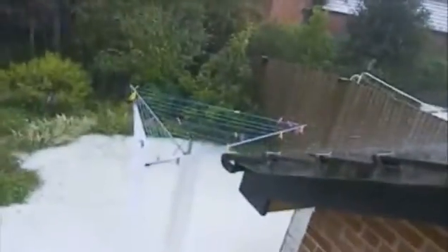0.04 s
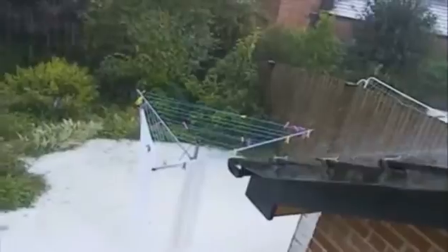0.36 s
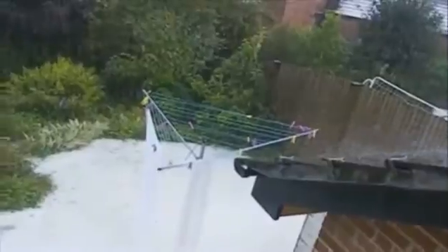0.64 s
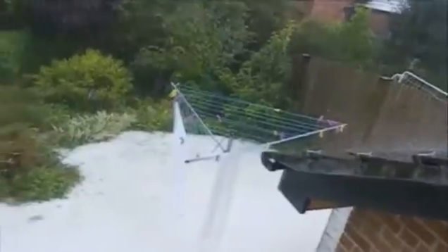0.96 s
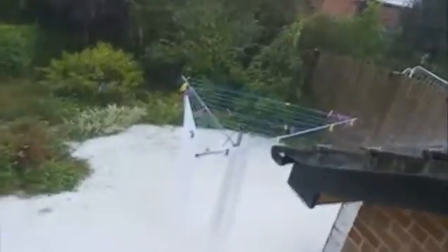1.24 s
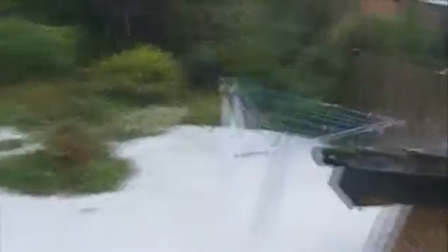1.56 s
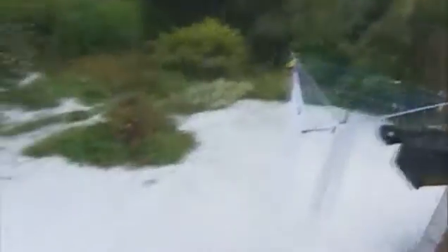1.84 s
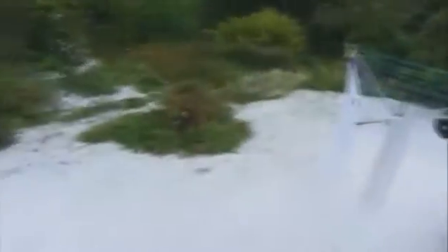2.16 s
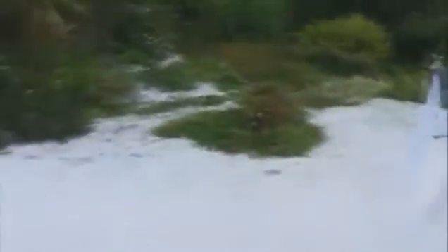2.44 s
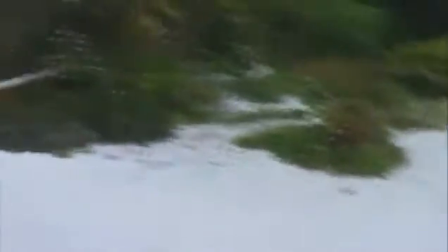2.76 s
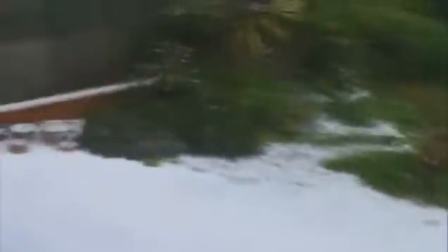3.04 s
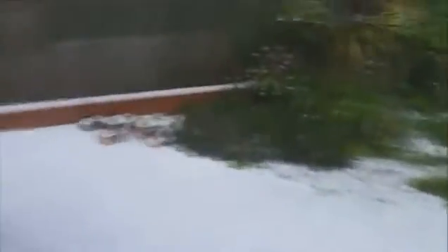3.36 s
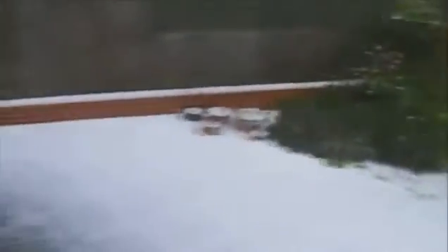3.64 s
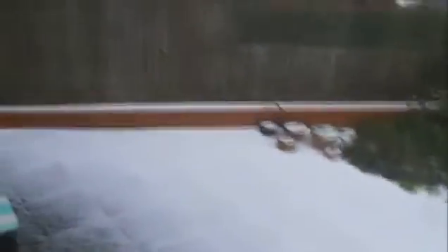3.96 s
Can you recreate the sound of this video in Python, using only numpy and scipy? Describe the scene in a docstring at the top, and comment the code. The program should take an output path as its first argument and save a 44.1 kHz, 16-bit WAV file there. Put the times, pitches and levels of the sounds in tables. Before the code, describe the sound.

Heavy hail roars steadily on a garden, with sharp clacks on nearby roof tiles.

```python
"""Heavy hail on a garden

Heard from a window above a low roof, countless stones merge into a roar.
Nearer ones patter, clack and snap on the tiles, and one knocks on something hollow.
Stones landing right by the microphone give tiny sharp ticks that make the recorder
turn its volume down for a moment."""
import sys
import numpy as np
from scipy import signal
from scipy.io import wavfile

SR = 44100
rng = np.random.default_rng(int(sys.argv[2]) if len(sys.argv) > 2 else 0)


def unload_wav(signal):
    """Save mono or channel-first audio to the path in sys.argv[1] as 16-bit WAV at rate SR, clipped to [-1, 1]."""
    wavfile.write(
        sys.argv[1],
        SR,
        np.round(np.clip(np.atleast_2d(signal).T, -1, 1) * 32767).astype(np.int16),
    )


N = 176400  # 4 seconds

# How strong the far roar is, from low to high: (pitch [Hz], level [dB])
ROAR_TONE = [(25, -15), (55, -22), (100, -15.5), (150, -1), (250, 0.5), (400, 5), (630, 5), (1000, 0.5),
             (1600, 1), (2300, 0), (3200, -2.5), (4200, -2.5), (5200, -12), (6000, -5.5), (6800, -11.5),
             (9000, -20.5)]


def roar(level_db=-31.5, flicker_db=1.66):
    """Far hail on lawn and leaves blurs into bands of noise, each flickering a little."""
    edges = 20 * 2 ** np.arange(0, 9.1, .5)  # half an octave apart
    noise = rng.standard_normal((2, N))
    out = 0
    for k, (low, high) in enumerate(zip(edges, edges[1:])):
        band = pass_only(noise[k % 2], "band", [low, high], order=2)
        band_db = at_hz(ROAR_TONE, np.sqrt(low * high)) + flicker_db * drift(22)
        out = out + band * from_db(band_db)
    return from_db(level_db) * rms_one(out)


# How strong the patter is, from low to high: (pitch [Hz], level [dB])
PATTER_TONE = [(130, -6), (300, -9), (650, -3), (1200, -2.5), (2500, -1), (4000, 3), (5500, -2.5),
               (6800, -14.5)]


def patter(level_db=-31.5, stones_per_s=3000, spread_db=2.5, colour_db=3.5, ring_cycles=5.74):
    """Nearer stones land at random; each rings very briefly with its own mix of pitches."""
    sizes_db = spread_db * np.minimum(rng.exponential(1, N), 3.2)  # many small, few big
    lands = rng.random(N) < stones_per_s / SR
    out = 0
    for hz in np.geomspace(140, 7500, 26):
        colour, sign = rng.uniform(-1, 1, (N, 2))[lands].T
        clicks = np.zeros(N)
        clicks[lands] = np.sign(sign) * from_db(sizes_db[lands] + colour_db * colour)
        ringing = rms_one(ring(clicks, hz, ring_cycles / hz))
        out = out + np.sqrt(hz) * from_db(at_hz(PATTER_TONE, hz)) * ringing
    return from_db(level_db) * rms_one(out)


# Big stones hitting the tiles: (time [s], level [dB])
TILE_HITS = [(.028, -22), (.083, -16), (.24, -27), (.313, -15), (.35, -19), (.562, -17), (.672, -23),
             (.693, -21), (.718, -22), (.948, -12.5), (1.305, -21), (1.395, -17), (1.515, -16),
             (1.633, -24), (1.665, -18.5), (1.79, -23), (1.848, -14), (2.022, -16), (2.31, -22.5),
             (2.845, -15.5), (3.18, -22), (3.472, -26), (3.515, -24), (3.687, -16), (3.722, -22.5)]


def clacks():
    """A big stone shatters on a tile in a short burst of chips."""
    return from_db(-6) * burst(clicks_of(TILE_HITS), hz=2970, fade_s=.038, ring_s=.002, rise_s=.0027)


# Close stones hitting a hard surface: (time [s], level [dB])
CLOSE_BOUNCES = [(.2475, -24), (.4238, -21), (.4435, -6.5), (.6873, -8), (1.1408, -13), (1.299, -19),
                 (1.4025, -14), (1.7905, -12), (1.8552, -22), (2.0795, -11), (2.2045, -16), (3.1931, -12),
                 (3.2545, -13), (3.3605, -25), (3.514, -23), (3.6815, -22), (3.8008, -16)]


def snaps():
    """A close stone bounces off whole with one dry snap."""
    return ring(clicks_of(CLOSE_BOUNCES), hz=3720, fade_s=.00082)


# Stones landing by the microphone: (time [s], level [dB])
MIC_HITS = [(.162, -7.5), (.255, -10), (.378, -6), (.41, -7.5), (.462, -11), (.735, -7), (.77, -9),
            (.812, -.5), (.842, -3), (.97, -6), (1.32, -9.5), (1.411, -4.5), (1.465, -6.5), (1.56, -11),
            (1.685, -5.5), (1.88, -9.5), (1.93, -9.5), (2.51, -6.5), (2.57, -4), (2.63, -6), (3.02, -8.5),
            (3.10, -8.5), (3.555, -5.5), (3.652, -7.5), (3.825, -3.5), (3.875, -2)]


def ticks():
    """Ice strikes right by the microphone: a tiny, bright tick, then a faint rattle."""
    hits = clicks_of(MIC_HITS)
    tick = pass_only(ring(hits, hz=11160, fade_s=.0018), "high", 6800, order=4)
    rattle = burst(hits, hz=4126, fade_s=.075, ring_s=.007, rise_s=.0025)
    return tick + from_db(-20) * rattle


# The one hit on something hollow: (time [s], level [dB])
HOLLOW_HIT = (1.238, -25)
# The notes it rings with: (pitch [Hz], level [dB], fade time [s])
HOLLOW_NOTES = [(223.5, 0.5, 0.16), (413, -21, 0.099), (722, 0.5, 0.053)]


def knock():
    """One stone sets something hollow ringing."""
    hit = clicks_of([HOLLOW_HIT])
    return sum(from_db(db) * ring(hit, hz, fade_s) for hz, db, fade_s in HOLLOW_NOTES)


def grit(level_db=-39, chips_per_s=450):
    """Chips of ice bounce and skitter, making a fine, bright crackle."""
    clicks = (rng.random(N) < chips_per_s / SR) * rng.standard_normal(N)
    return from_db(level_db) * random_rings(clicks, low_hz=3300, high_hz=6400, count=12, fade_s=.003)


def pings(level_db=-41, stones_per_s=130):
    """Some stones find a hard edge that rings briefly at one pitch."""
    clicks = (rng.random(N) < stones_per_s / SR) * rng.uniform(-1.05, 1, N)
    return from_db(level_db) * random_rings(clicks, low_hz=2076, high_hz=3758, count=44, fade_s=.15)


def gain_control(x, limit_db=-14, recover_db_per_s=68.5, react_s=.0023):
    """A loud peak makes the recorder turn down fast; the volume then climbs steadily back."""
    excess_db = np.maximum(20 * np.log10(np.abs(x) + 1e-9) - limit_db, 0)
    climb_db = recover_db_per_s * np.arange(N) / SR
    dip_db = np.maximum.accumulate(excess_db + climb_db) - climb_db
    return x * from_db(-smooth(dip_db, react_s))


# Two bands that the microphone boosts, shifting as it is turned:
# (time [s], pitch [Hz], width [Hz], boost [dB])
MIC_LOWER_BAND = [(0, 2580, 750, 6.5), (0.599, 2610, 762, 6), (1.2, 2540, 645, 6), (1.9, 2660, 595, 6.5),
                  (2.6, 2620, 608, 5.5), (2.95, 2800, 587, 4), (3.2, 2250, 810, 4), (3.47, 2390, 794, 7),
                  (3.72, 2610, 750, 7.5), (4, 2450, 756, 5)]
MIC_UPPER_BAND = [(0, 3220, 590, 4.8), (.6, 3080, 590, 6.2), (1.2, 3060, 556, 5.8), (1.9, 3070, 550, 4.4),
                  (2.6, 3120, 550, 4.7), (2.85, 3250, 300, 7.4), (3.1, 3180, 330, 9.6),
                  (3.33, 3250, 380, 11), (3.39, 3450, 750, 6), (3.52, 3600, 750, 4.1),
                  (3.65, 3280, 700, 5.3), (4, 3300, 700, 4.4)]


def microphone(x):
    """The microphone's small opening boosts three bands and weakens the bass and treble."""
    x = resonance(x, MIC_LOWER_BAND)
    x = resonance(x, MIC_UPPER_BAND)
    x = resonance(x, [(0, 3800, 280, 2)])  # the third band stays put
    x = pass_only(x, "low", 3713, order=5)
    return pass_only(x, "high", 108, order=2)


def self_noise(rumble_db=-62, hiss_db=-54):
    """The recorder adds a faint rumble and hiss of its own."""
    low, high = rng.standard_normal((2, N))
    rumble = pass_only(low, "low", 39.8, order=2)
    hiss = pass_only(pass_only(high, "low", 4760, order=6), "high", 2000, order=2)
    return from_db(rumble_db) * rms_one(rumble) + from_db(hiss_db) * rms_one(hiss)


def from_db(db):
    """Turn decibels into a number to multiply by."""
    return 10 ** (np.asarray(db) / 20)


def rms_one(x):
    """Scale a signal to an average strength (rms) of 1."""
    return x / np.sqrt(np.mean(x ** 2) + 1e-20)


def in_time(rows):
    """Join a table's rows with straight lines, giving values for every sample."""
    times, *columns = np.transpose(rows)
    return [np.interp(np.arange(N) / SR, times, column) for column in columns]


def at_hz(rows, hz):
    """Read the level at any pitch from a tone table."""
    pitches, levels = np.transpose(rows)
    return np.interp(np.log(hz), np.log(pitches), levels)


def drift(hz):
    """A smooth random wobble, about 1 in size."""
    r = np.exp(-80 * np.pi * hz / SR)
    noise = rng.standard_normal(N // 40 + 2002)  # one value per 40 samples
    slow = signal.lfilter([1], [1, -2 * r, r * r], noise)[2000:]
    return np.interp(np.arange(N) / 40, np.arange(len(slow)), rms_one(slow))


def clicks_of(rows):
    """One click for each (time [s], level [dB]) row."""
    out = np.zeros(N)
    for s, db in rows:
        out[int(s * SR)] = from_db(db)
    return out


def ring(clicks, hz, fade_s):
    """Each click starts a pure tone that fades by 60 dB in fade_s."""
    r = np.exp(-np.log(1000) / (fade_s * SR))
    w = 2 * np.pi * hz / SR
    return signal.lfilter([0, np.sin(w)], [1, -2 * r * np.cos(w), r * r], clicks + 1e-18)


def random_rings(clicks, low_hz, high_hz, count, fade_s):
    """Each click rings at a pitch picked at random from a set."""
    pitches = np.geomspace(low_hz, high_hz, count)
    picked = rng.integers(0, count, N)
    return rms_one(sum(ring(clicks * (picked == k), hz, fade_s) for k, hz in enumerate(pitches)))


def burst(hits, hz, fade_s, ring_s, rise_s):
    """Each hit starts a puff of noise around one pitch, which swells fast and dies away."""
    swelling = smooth(hits + 1e-18, rise_s)
    loudness = signal.lfilter([1], [1, -np.exp(-np.log(1000) / (fade_s * SR))], swelling)
    return loudness * rms_one(ring(rng.standard_normal(N), hz, ring_s))


def smooth(x, seconds):
    """Soften sudden changes."""
    r = np.exp(-1 / (seconds * SR))
    return signal.lfilter([1 - r], [1, -r], x)


def pass_only(x, kind, hz, order):
    """Let the lows, the highs or a band through; a higher order cuts more steeply."""
    return signal.sosfilt(signal.butter(order, hz, kind, fs=SR, output="sos"), x)


def resonance(x, rows, block=128):
    """Boost one band, taking its pitch, width and boost from a table."""
    hz, width, boost_db = in_time(rows)
    band, state = np.zeros(N), np.zeros(2)
    for i in range(0, N, block):
        r = np.exp(-np.pi * width[i] / SR)
        b = (1 - r * r) / 2 * np.array([1, 0, -1])
        a = [1, -(1 + r * r) * np.cos(2 * np.pi * hz[i] / SR), r * r]
        band[i:i + block], state = signal.lfilter(b, a, x[i:i + block], zi=state)
    return x + (from_db(boost_db) - 1) * band


# How hard the hail is falling: (time [s], level [dB])
HAIL_STRENGTH = [(0, 1), (.45, 2), (.64, 0.5), (.84, 3.1), (1.05, 2.5), (1.25, 0.6), (1.45, 0.4),
                 (1.8, 2.4), (2.1, 0.8), (2.4, 1.6), (2.62, 2.7), (2.85, 1), (3.1, 1.4), (3.3, -1),
                 (3.45, 1.3), (3.8, 0.9), (4, 4)]


def scene():
    """The hail swells and eases, with single stones on top."""
    strength_db, = in_time(HAIL_STRENGTH)
    hail = from_db(strength_db) * (roar() + patter() + pings())
    return (hail + clacks() + snaps() + knock() + ticks())[None]


def record(dry, ceiling=.33, cutoff_hz=6800):
    """The recorder dips, colours the sound, adds noise, rounds off peaks and cuts the top."""
    x = microphone(gain_control(dry[0])) + self_noise()
    rounded = x / (1 + (x / ceiling) ** 6) ** (1 / 6)
    steep_cut = signal.ellip(10, .2, 90, cutoff_hz, fs=SR, output="sos")
    return signal.sosfilt(steep_cut, rounded)[None]


dry = scene()
out = record(dry)
unload_wav(out)
```